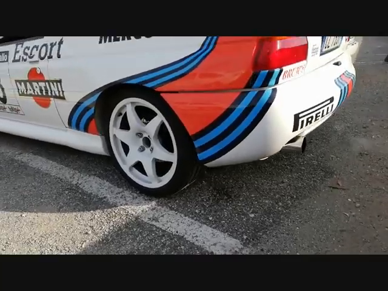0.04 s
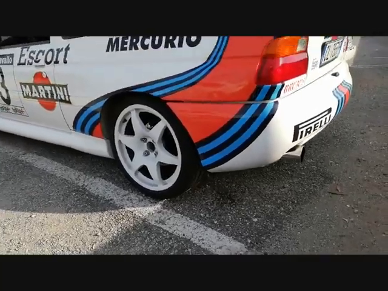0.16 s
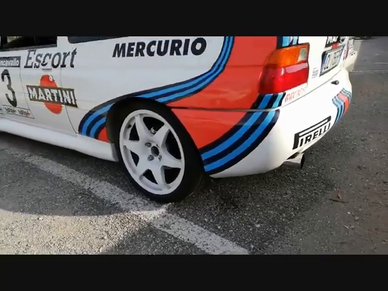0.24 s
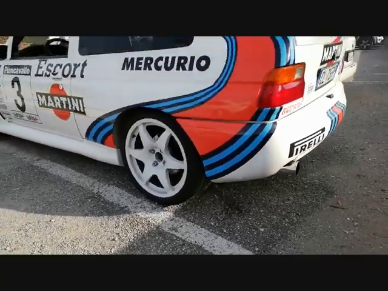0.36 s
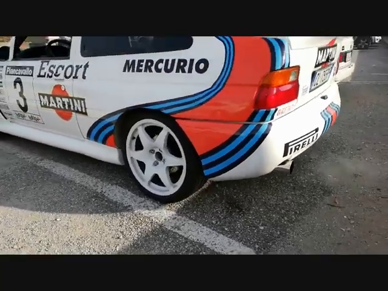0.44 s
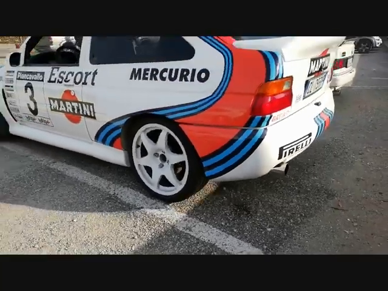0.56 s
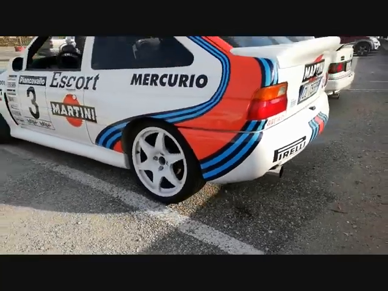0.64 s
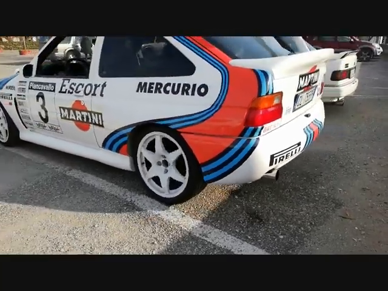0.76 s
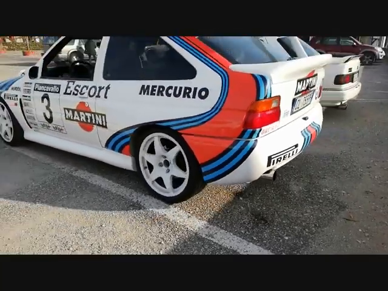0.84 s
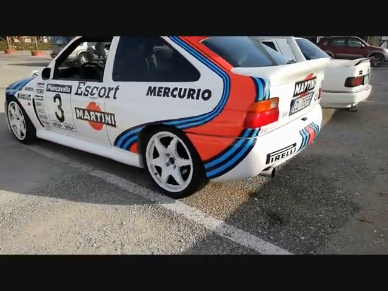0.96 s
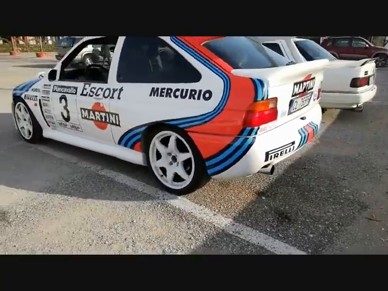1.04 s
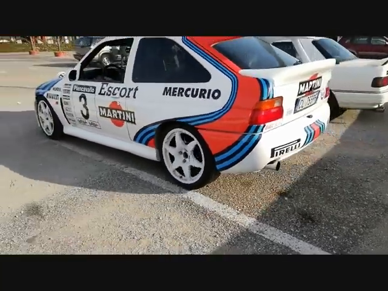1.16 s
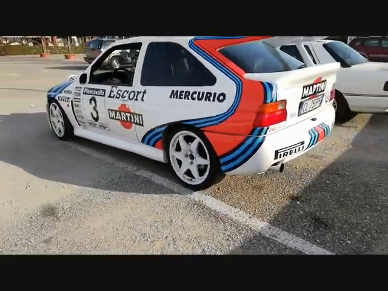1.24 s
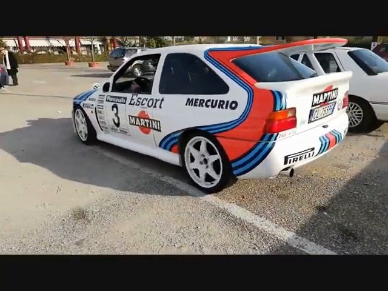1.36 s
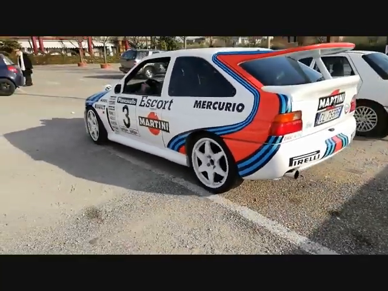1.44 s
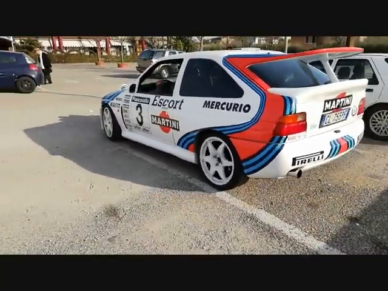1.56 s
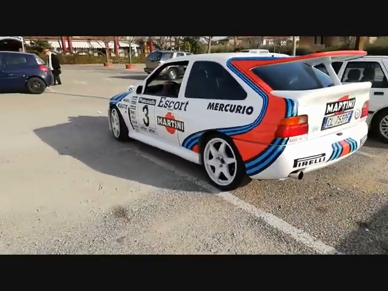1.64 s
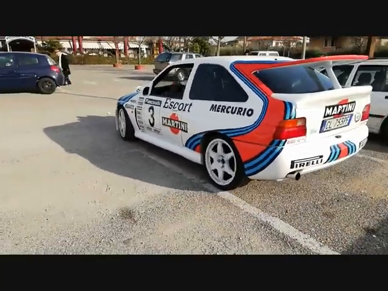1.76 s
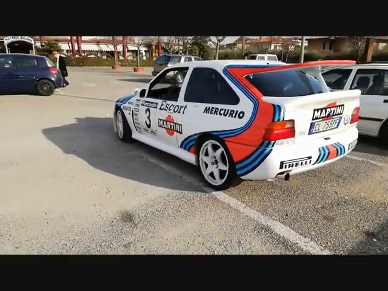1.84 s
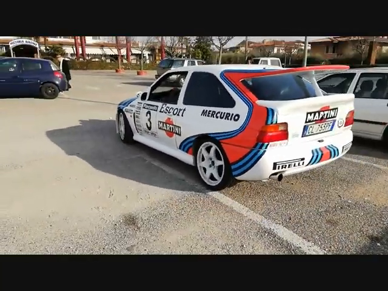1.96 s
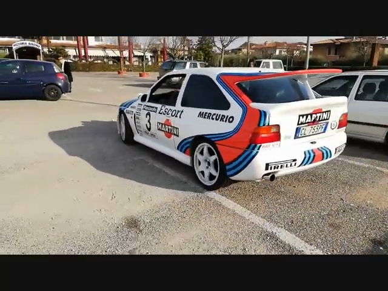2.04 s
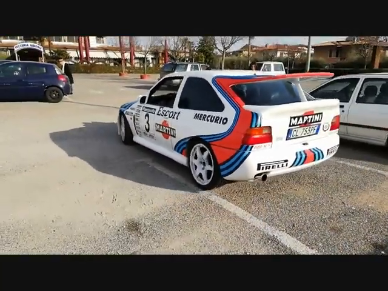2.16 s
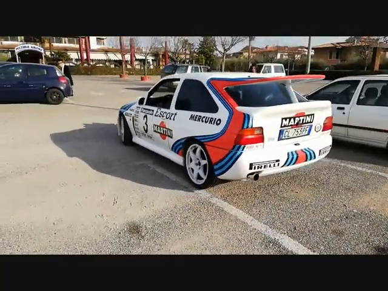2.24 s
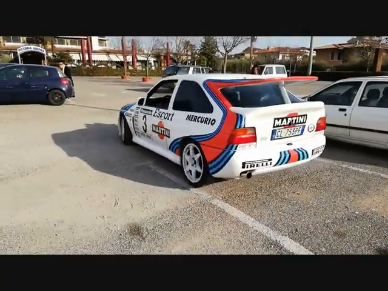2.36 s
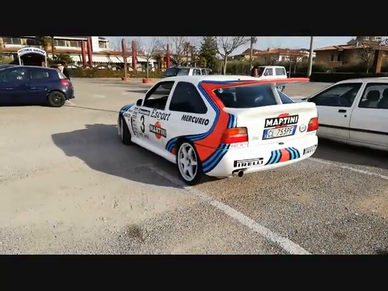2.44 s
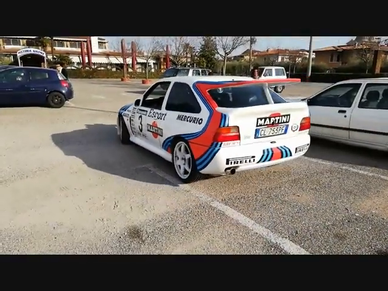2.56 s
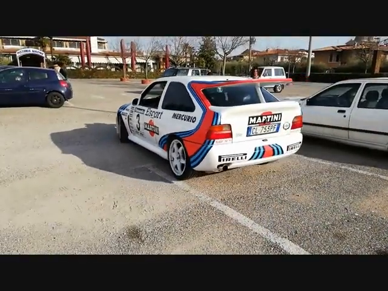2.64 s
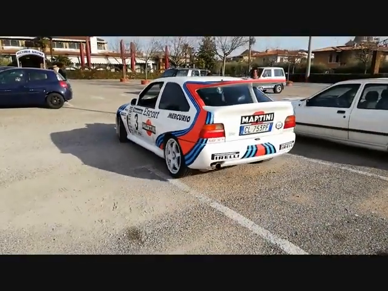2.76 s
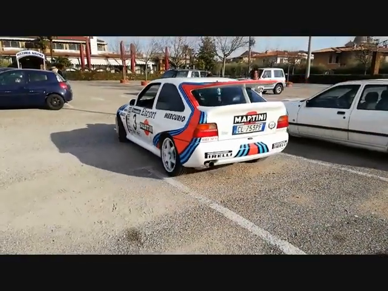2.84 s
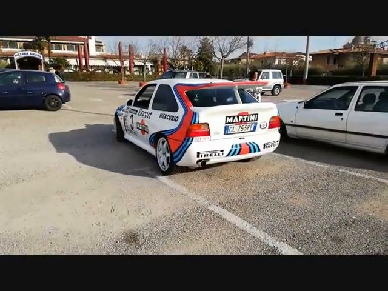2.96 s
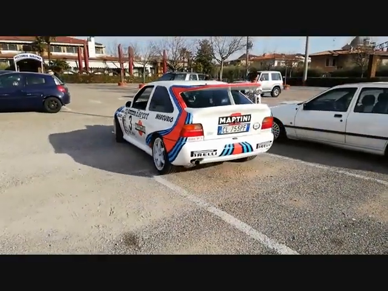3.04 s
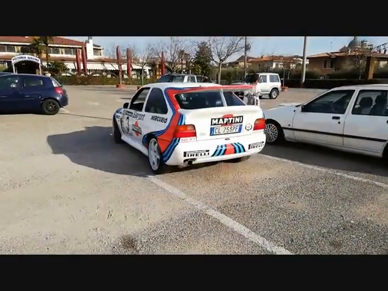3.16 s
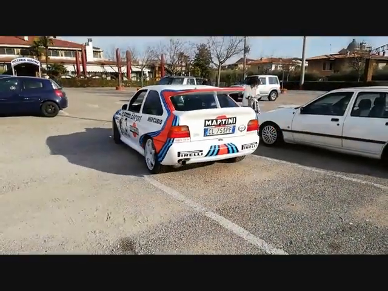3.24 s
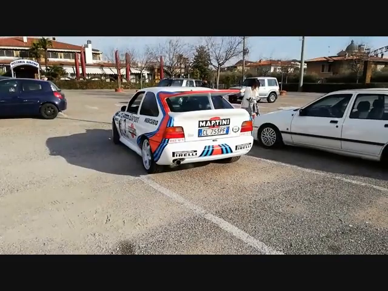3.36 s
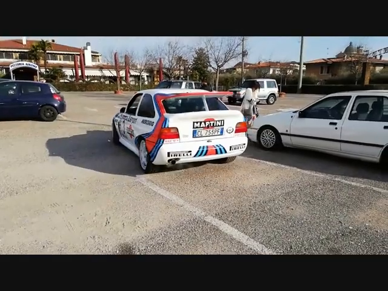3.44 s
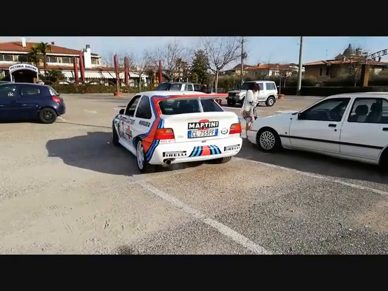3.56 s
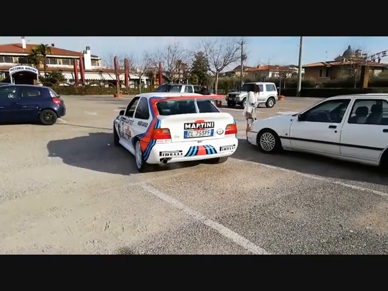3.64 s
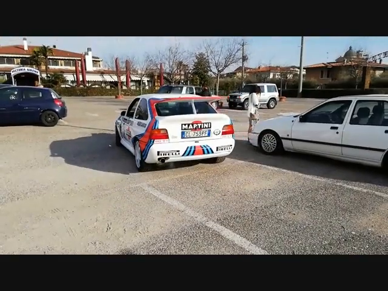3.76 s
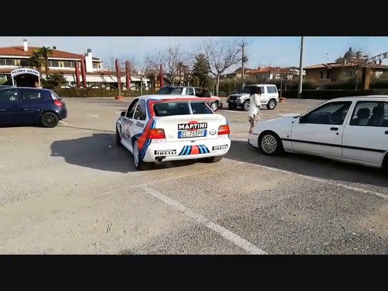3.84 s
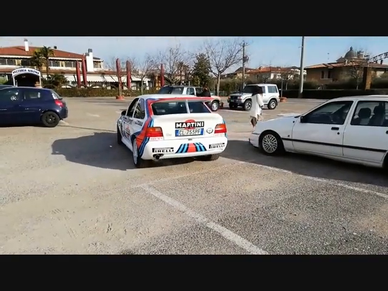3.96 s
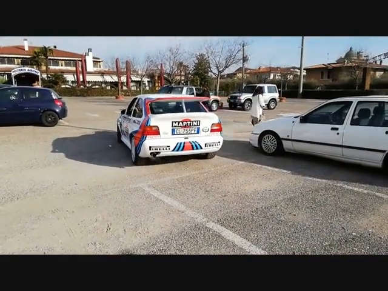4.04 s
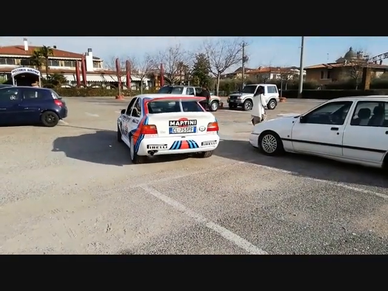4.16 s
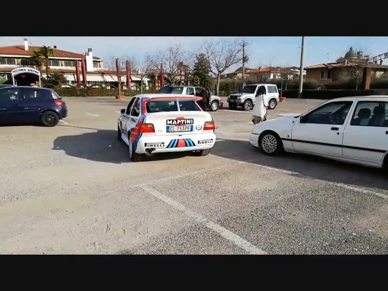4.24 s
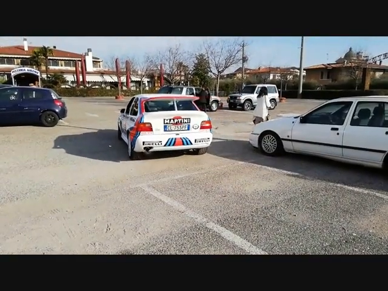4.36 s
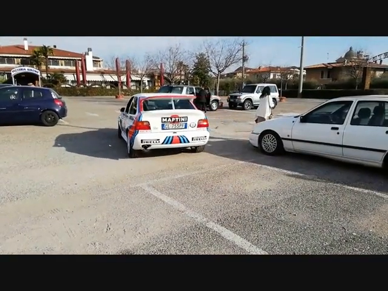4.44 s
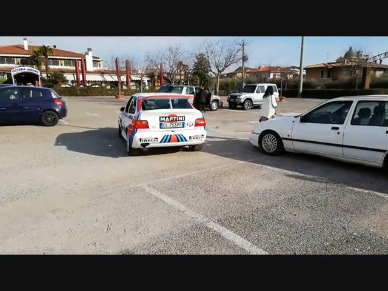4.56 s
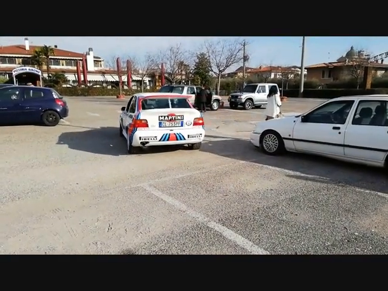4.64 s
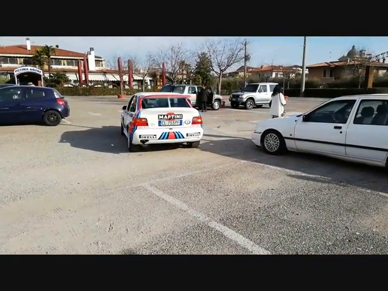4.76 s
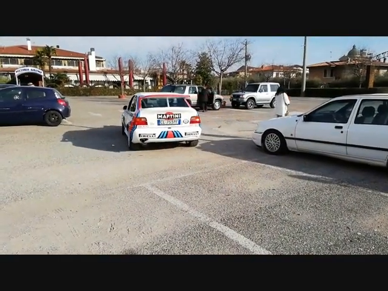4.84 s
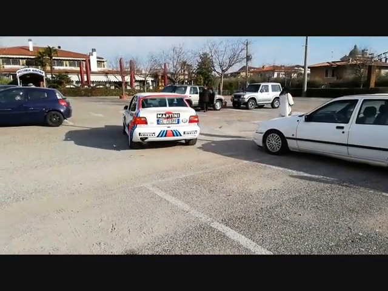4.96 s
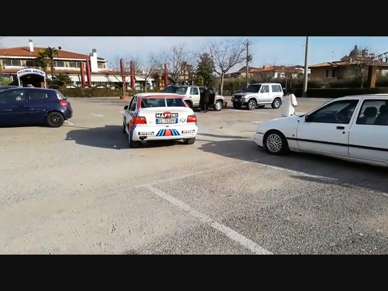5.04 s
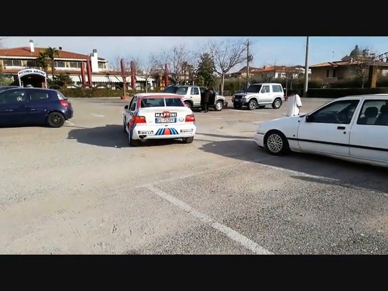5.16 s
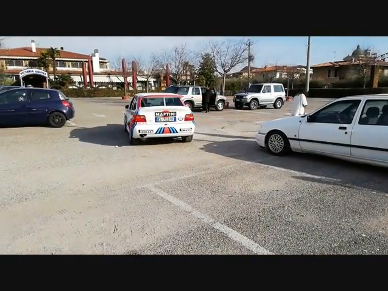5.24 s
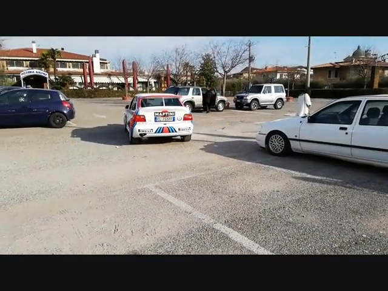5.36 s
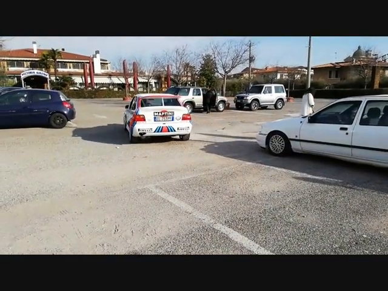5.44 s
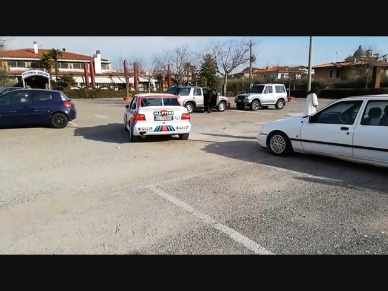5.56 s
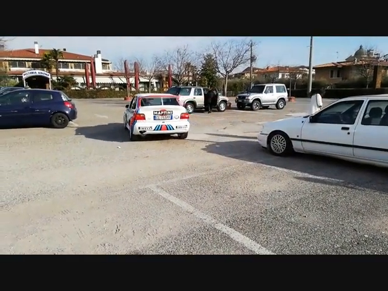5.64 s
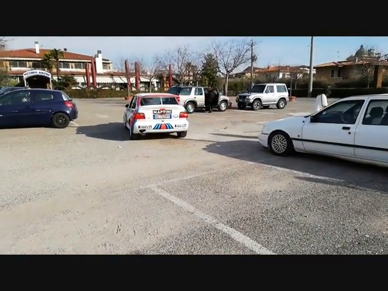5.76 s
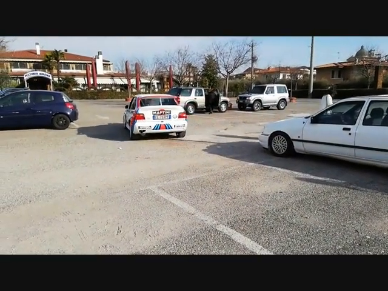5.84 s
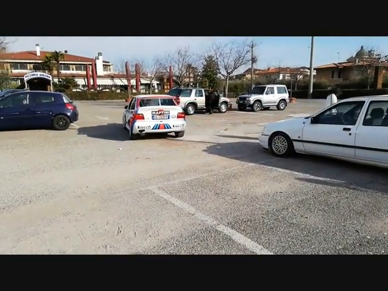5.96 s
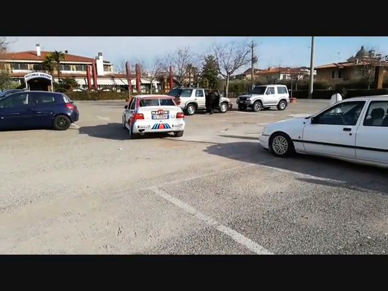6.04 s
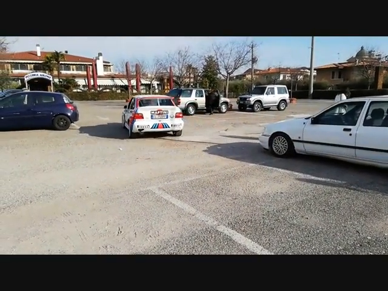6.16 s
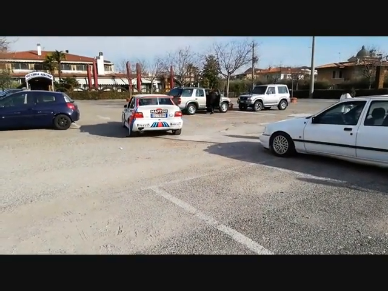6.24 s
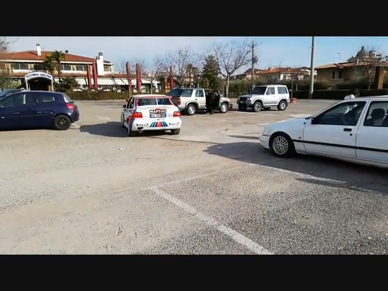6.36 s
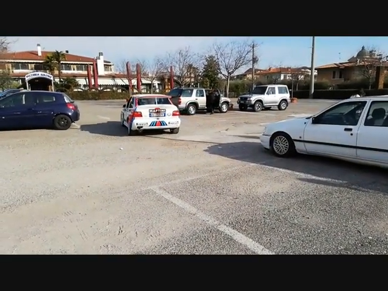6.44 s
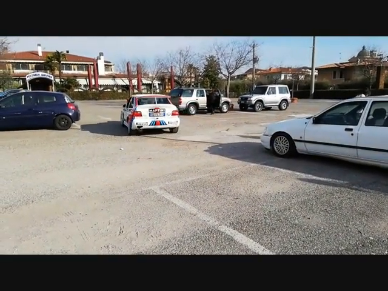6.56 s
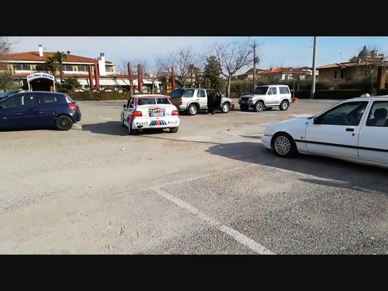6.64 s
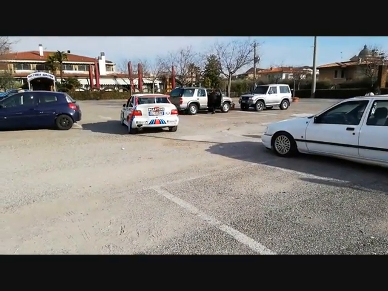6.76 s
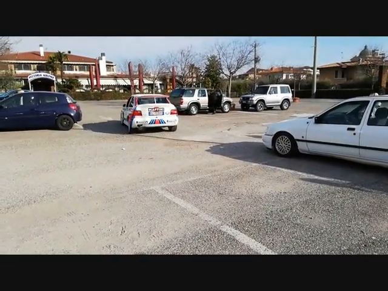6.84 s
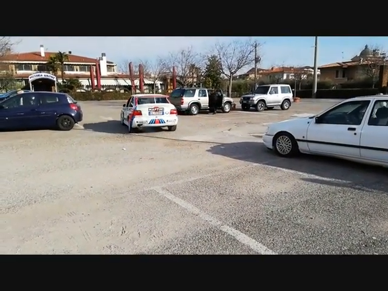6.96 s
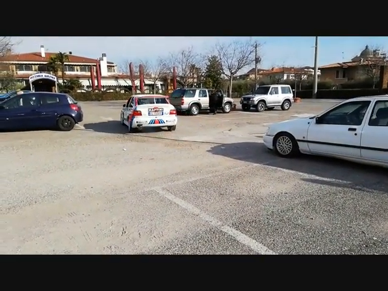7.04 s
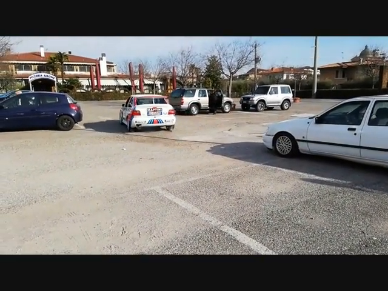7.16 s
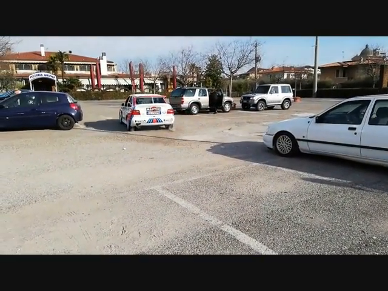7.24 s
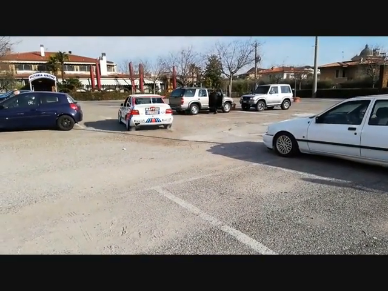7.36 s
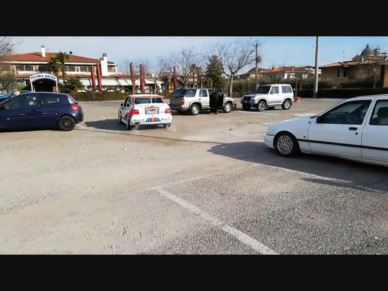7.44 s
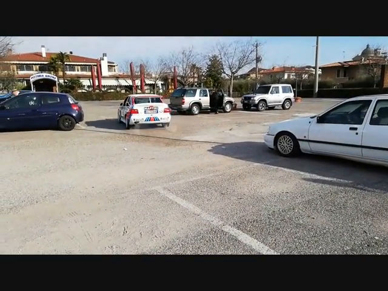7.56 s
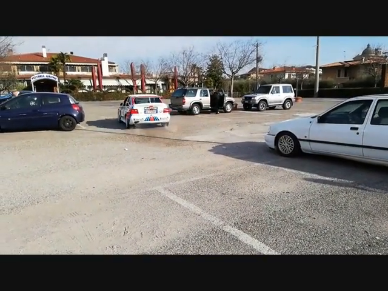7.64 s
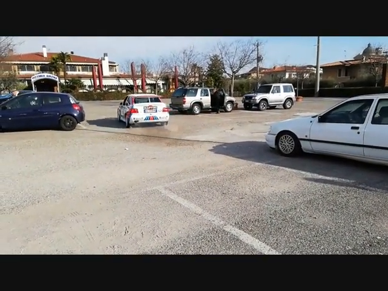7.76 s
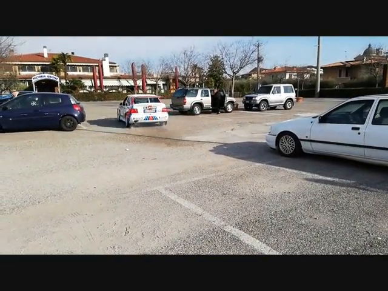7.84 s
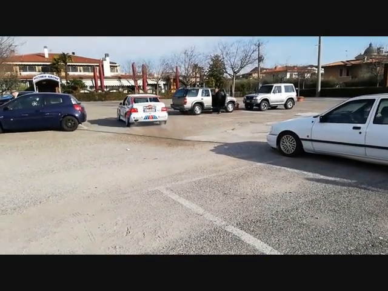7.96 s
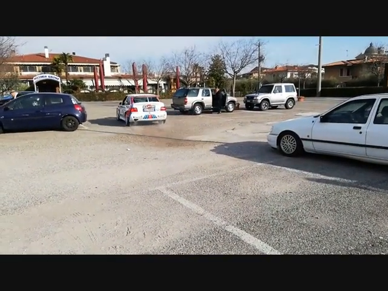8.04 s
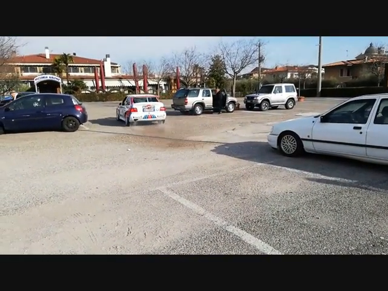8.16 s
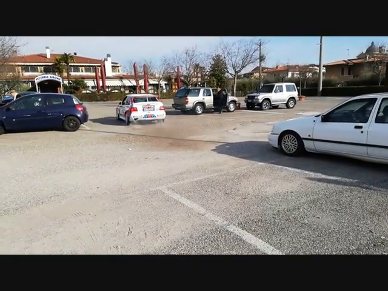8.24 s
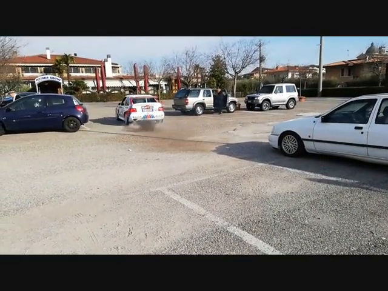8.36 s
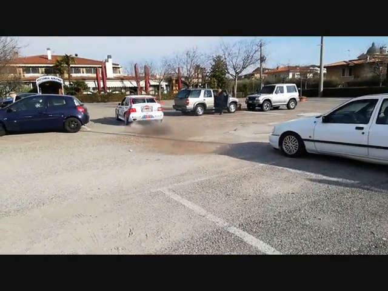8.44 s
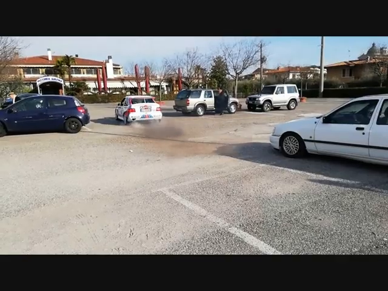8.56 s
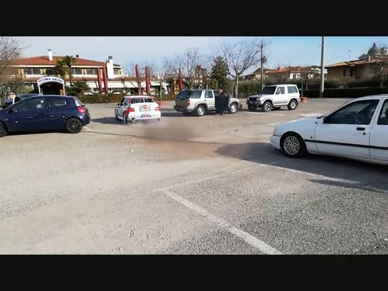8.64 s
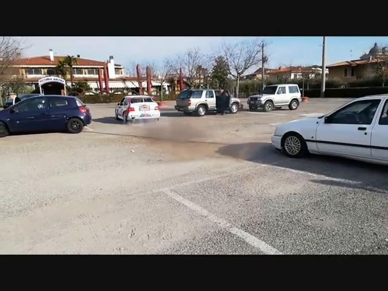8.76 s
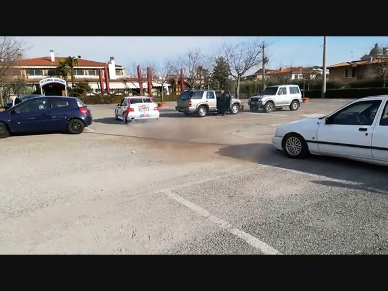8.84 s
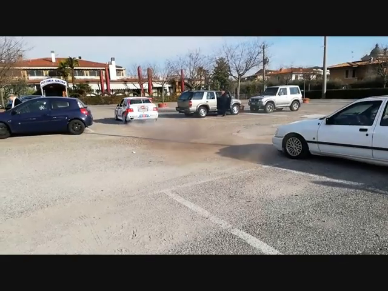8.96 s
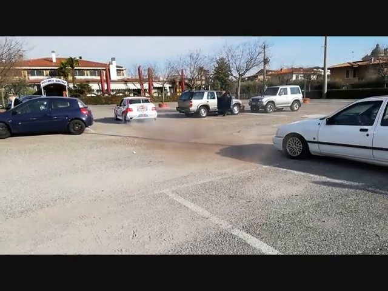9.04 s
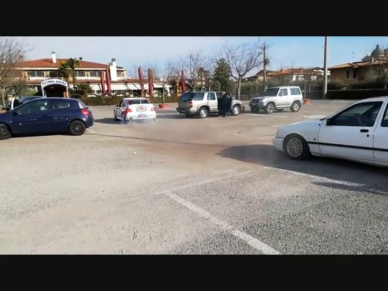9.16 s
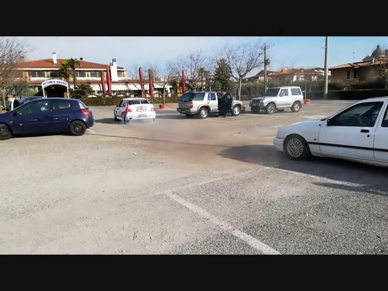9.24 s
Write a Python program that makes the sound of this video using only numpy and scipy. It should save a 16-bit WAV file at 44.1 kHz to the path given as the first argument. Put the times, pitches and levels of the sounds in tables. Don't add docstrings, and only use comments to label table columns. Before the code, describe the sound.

A turbocharged car throbs slowly away over gritty ground, then launches with whistling intake, squealing tyres, limiter-high revs and sharp exhaust bangs.

```python
import sys
import numpy as np
from scipy import signal
from scipy.io import wavfile

SR = 44100
rng = np.random.default_rng(int(sys.argv[2]) if len(sys.argv) > 2 else 0)


def gain_from_db(level_db):
    decades = np.asarray(level_db, float) / 20
    return 10 ** decades


def transcribe(signal):
    frames = np.atleast_2d(signal).T
    limited = np.clip(frames, -1, 1)
    pcm = np.round(limited * 32767).astype(np.int16)
    wavfile.write(sys.argv[1], SR, pcm)


N = 410571
TIME = np.arange(N) / SR


def rms_one(x):
    return x / np.sqrt(np.mean(x ** 2) + 1e-20)


def in_time(rows):
    s, *columns = np.transpose(rows)
    return [np.interp(TIME, s, c) for c in columns]


def at_hz(points, hz):
    table_hz, table_db = np.array(points)[:, 0], np.array(points)[:, 1]
    return np.interp(np.log(hz), np.log(table_hz), table_db)


def drift(rate, first=0, step=1):
    r = np.exp(-40 * np.pi * rate / SR)
    slow = signal.lfilter([1], [1, -2 * r, r * r], rng.standard_normal(N // 20 + 2002))[2000:]
    return np.interp(np.arange(first, N + step - 1, step) / 20, np.arange(len(slow)), rms_one(slow))


def band(x, low_hz, high_hz):
    edges_hz = [low_hz, min(high_hz, .45 * SR)]
    return signal.sosfilt(signal.butter(2, edges_hz, "band", fs=SR, output="sos"), x)


def ring(clicks, hz, t60):
    r, w = gain_from_db(-60 / (t60 * SR)), 2 * np.pi * hz / SR
    return signal.lfilter([0, np.sin(w)], [1, -2 * r * np.cos(w), r * r], clicks + 1e-18)


def clicks_at(seconds, db, sign=1):
    out = np.zeros(N)
    at = np.round(np.asarray(seconds) * SR).astype(int)
    out[np.minimum(at, N - 1)] = sign * gain_from_db(db)
    return out


def bumps(s, half_s, height, slower=1, order=2):
    coarse = TIME[::44]
    total = 0
    for t, half, h in np.broadcast(s, half_s, height):
        stretch = half * np.where(coarse > t, slower, 1)
        total = total + h * np.exp(-np.abs((coarse - t) / stretch) ** order)
    return np.interp(TIME, coarse, total)


def narrow(centre_hz, width_hz):
    first, phase = N - len(centre_hz), 2 * np.pi * np.cumsum(centre_hz) / SR
    return drift(width_hz, first) * np.cos(phase) - drift(width_hz, first) * np.sin(phase)


# pitch_hz, likeness (0 to 1)
LEFT_RIGHT_LIKENESS = [(60, 0.99), (180, 1), (400, 0.23), (900, 0.075), (2000, 0.089), (4900, 0.28),
                       (8000, 0.62), (10500, 0.13), (14700, 0.33)]
# pitch_hz, left_minus_right_db
LEFT_LEAN = [(60, -2), (180, 1), (540, -2.5), (1630, -4), (4880, 0.5), (8000, 1.5), (14700, -2)]


def banded_noise(spectrum, patchy_db, flicker_rate):
    out, together = 0, drift(6.6, step=20)
    lowest_hz, highest_hz = spectrum[0][0], spectrum[-1][0]
    edges = lowest_hz * 2 ** np.arange(0, np.log2(highest_hz / lowest_hz) + .3, 1 / 3)
    white = rng.standard_normal((2, 2, N))
    for k, (low, high) in enumerate(zip(edges, edges[1:])):
        mid, side = band(white[k % 2], low, high)
        hz = np.sqrt(low * high)
        alike = np.clip(at_hz(LEFT_RIGHT_LIKENESS, hz), 0, 1)
        flicker = together + drift(flicker_rate, step=20)
        gain = gain_from_db(at_hz(spectrum, hz) + patchy_db * flicker)
        gain = np.interp(np.arange(N), np.arange(len(gain)) * 20, gain)
        lean = gain_from_db(at_hz(LEFT_LEAN, hz) / 2) ** np.array([[1], [-1]])
        out = out + gain * lean * (np.sqrt(1 + alike) * mid + np.sqrt(1 - alike) * side * [[1], [-1]])
    return rms_one(out)


# time_s, stereo_share (0 to 1)
STEREO_WIDTH = [(0, 1), (4, 0.89), (5, 0.71), (6.3, 0.6), (7, 0.94), (9.31, 0.59)]


def narrowed(x):
    mid = x.mean(axis=0)
    return mid + np.clip(in_time(STEREO_WIDTH)[0], 0, 1) * (x - mid)


# time_s, level_db
CAR_NOISE = [(0, -42), (.7, -45), (1.06, -42.5), (1.4, -42), (2.46, -41), (3.0, -42.5), (3.24, -44),
             (3.7, -46), (3.97, -42.5), (4.3, -46), (5.2, -40.5), (6.65, -40), (6.88, -33.5), (7.35, -27),
             (7.95, -32), (8.2, -25.5), (8.6, -25.5), (9.31, -27.5)]
# centre_s,
# half_length_s, level_db
GRIT_PATCHES = [(0.815, 0.064, -4), (1.038, 0.13, 6), (3.54, 0.11, -3), (3.075, 0.043, -8),
                (5.93, 0.23, 2.5), (6.237, 0.082, -1), (11, 0.036, -2), (8.847, 0.008, -10), (7, .1, -5),
                (7.0, .09, 4), (3.1, .12, 0)]


def noise_levels():
    roar_db, = in_time(CAR_NOISE)
    boost = np.clip((TIME - 6.5) / 0.2, 0, 1)
    swing_db = roar_db + 42.5
    rumble_db = -37.5 + 0.41 * swing_db - 1.26 * TIME + 7 * boost
    hiss_db = -48.5 + 1.035 * swing_db - 0.95 * TIME + 3.5 * boost
    return roar_db, rumble_db, hiss_db + bumps(*np.transpose(GRIT_PATCHES)), boost


# pitch_hz, level_db (per Hz)
BODY_RUMBLE = [(18, -31), (40, 12.5), (90, 7.5), (200, 11.5), (330, 1.5), (470, 3.5), (660, -4.5),
               (900, -5), (1100, -31)]


def body_rumble(rumble_db, beat):
    throb = 1 + .35 * beat
    rumble = gain_from_db(rumble_db + 9) * throb * banded_noise(BODY_RUMBLE, patchy_db=0.4, flicker_rate=7.3)
    return rumble - 0.66 * np.exp(-TIME / 4.0) * band(rumble, 376, 694)


# pitch_hz, level_db (per Hz)
GAS_ROAR = [(560, -12), (800, -2.5), (1300, 1.5), (1850, 0), (2420, -17.5), (2980, -7.5), (4040, -19),
            (5000, -19.5)]


def gas_roar(roar_db, pulse):
    return gain_from_db(roar_db + 5.5) * pulse * banded_noise(GAS_ROAR, patchy_db=1.48, flicker_rate=37.0)


# pitch_hz, level_db (per Hz)
GRIT_HISS = [(1760, -14.5), (3000, 4.5), (4210, -46), (4750, 0), (6800, -7), (8850, -3.5), (10000, 0),
             (11600, -8), (14000, -21), (15300, -19)]


def grit_hiss(boost):
    hiss = banded_noise(GRIT_HISS, patchy_db=0.76, flicker_rate=7.0)
    crunch_s, crunch_half_s, _ = GRIT_PATCHES[1]
    hiss = hiss + bumps(crunch_s, crunch_half_s, [1.4]) * band(hiss, 8800, 16000)
    turbo = .5 * boost * band(hiss, 9300, 10130)
    return hiss + turbo + bumps([6.72], 0.18, 1.3) * band(hiss, 10900, 13500)


# start_s, peak_db, ring_hz,
# bright_part_db (relative to peak)
SHARP_TICKS = [(0.969, -21, 1669, -12), (0.997, -14, 1688, -8), (1.034, -19, 1421, -8), (1.069, -18, 1320, -11),
               (2.002, -18.5, 1163, -8), (2.064, -23, 1370, -8), (2.175, -18, 1020, -13),
               (2.585, -18.5, 1590, -12), (2.869, -24.5, 1333, -1.5), (2.922, -24, 850, -5),
               (3.159, -21, 1460, -16), (3.209, -18.5, 1678, -11.5), (3.291, -26, 1694, -7),
               (3.304, -21, 1200, -2), (3.366, -19, 1012, -15), (3.376, -17, 1071, -15), (3.425, -18, 1200, -9),
               (3.477, -19, 1480, -22), (3.791, -16.5, 1413, -18), (3.804, -28, 889, -1.5),
               (3.868, -26, 1302, -8), (3.958, -16, 1167, -23), (4.587, -11.5, 1242, -24),
               (4.681, -17.5, 1138, -24), (4.9432, -13, 1666, -24), (4.951, -12, 1554, -24),
               (5.0054, -11, 1150, -35.5), (5.025, -7, 1100, -40), (5.057, -8, 1060, -37),
               (5.114, -9, 1066, -40), (0.927, -30, 1500, -7), (0.988, -26, 1400, -10), (1.01, -26, 1510, -2),
               (1.09, -29, 1200, -6), (1.12, -25, 1150, -16), (2.79, -18, 1600, -12.5), (2.115, -28, 1290, -7),
               (2.464, -24, 1300, -8), (2.649, -29, 1300, -2), (2.84, -32, 1300, -1), (3.333, -29, 1312, -3),
               (4.16, -31.5, 1296, 1), (8.312, -4, 1080, -28), (8.454, 10, 1150, -30), (8.511, -10, 1224, -30),
               (8.543, -2, 900, -30), (8.59, -4, 1160, -30), (8.86, -0.5, 1600, -7), (8.039, -5, 1090, -30)]


def sharp_ticks():
    out, u = np.zeros(N), np.arange(round(0.037 * SR)) / SR
    white = rng.standard_normal((len(SHARP_TICKS), len(u)))
    snaps = band(white, 1800, 6100) + 0.89 * band(white, 8900, 11200) + 0.24 * band(white, 8900, 16000)
    snaps = snaps * (1 - np.exp(-u / 0.0027)) * np.exp(-u / 0.0036)
    rattles = band(white, 930.0, 1880.0) * np.exp(-u / 0.0024)
    for (s, db, hz, bright_db), snap, rattle in zip(SHARP_TICKS, snaps, rattles):
        knock = np.sin(2 * np.pi * hz * u) * (1 - np.exp(-u / 0.00079)) * np.exp(-u / 0.00082)
        at = round(s * SR)
        out[at:at + len(u)] += gain_from_db(db) * (knock + gain_from_db(0.57 * bright_db + 9) * rattle + gain_from_db(bright_db + 9) * snap)
    left = np.where(TIME < 4.4, np.roll(out, 4), out)
    return np.array([left, out]) * gain_from_db(np.array([[-1.5], [1.5]]))


# time_s, level_db, pitch_hz
NARROW_RUSH = [(4.9, -60, 1706), (5.1, -45, 1920), (5.25, -44.5, 2052), (5.5, -48, 1753), (5.9, -42, 1700),
               (6.15, -52, 1860), (6.45, -45, 1692), (6.75, -48, 1672), (6.9, -32, 1507), (7.1, -34, 1453),
               (7.25, -60, 1470), (8.15, -60, 2050), (8.18, -25, 1900), (8.23, -30, 1520), (8.32, -27, 1700),
               (8.36, -60, 1700)]
# centre_s, half_length_s, then its tones as pitch_hz, level_db
CHIRP = (4.175, .018, [(7300, -50), (9900, -53)])


def whistles():
    first = 4 * SR
    level_db, centre_hz = (column[first:] for column in in_time(NARROW_RUSH))
    time = TIME[first:]
    rush = narrow(centre_hz, 190.0) + 0.52 * (time < 6.3) * narrow(1.45 * centre_hz, 370.0)
    rush = gain_from_db(level_db) * rush * (time < 8.4) * (time > 4.9)
    s, half_s, tones = CHIRP
    chirp = sum(gain_from_db(db) * narrow(np.full(len(time), hz), 150.0) for hz, db in tones)
    return np.pad(rush + chirp * np.exp(-((time - s) / half_s) ** 2), (first, 0))


# start_s, peak_db, ring_hz
PANEL_SLAPS = [(7.811, -9, 520), (8.049, -14, 475.6), (8.105, -13, 450), (8.3356, 3, 640), (8.342, 2, 560),
               (8.4005, -6, 497), (8.461, -8, 900), (8.543, -5, 620), (8.549, -5, 560), (8.858, -13, 500),
               (9.172, -12, 400), (9.19, -17, 520)]


def panel_slaps():
    out, u = np.zeros(N), np.arange(-300, 300) / SR
    for s, db, hz in PANEL_SLAPS:
        at = round(s * SR)
        out[at - 300:at + 300] += -gain_from_db(db) * np.cos(2 * np.pi * hz * u) * np.exp(-(u / .0016) ** 2)
    return out * np.array([[1], [-0.46]])


# time_s, level_db, pitch_hz
TYRE_SQUEAL = [(7.09, -34, 1123), (7.115, -9.5, 1067), (7.8, -9.5, 1099), (7.83, -14, 1089),
               (7.96, -16, 1121), (8.17, -19, 1196), (8.26, -13, 1219), (8.37, -12.5, 1119),
               (8.6, -16.5, 1147), (8.83, -14.5, 1214), (8.87, -10, 1151), (9.31, -17, 1118)]
# multiple_of_pitch, width_hz, level_db
TREAD_TONES = [(.79, 45, -6), (.9, 25, -1), (1.0, 25, -3), (1.08, 25, 0), (1.19, 30, -2), (1.5, 120, -8),
               (1.66, 120, -11)]
# centre_s, level_db
TREAD_BITES = [(7.135, 2.5), (7.28, 7.5), (7.356, 3.5), (7.38, 9), (7.433, -0.5), (7.6, 0), (7.666, -2),
               (7.688, -0.5), (7.9, 2), (7.951, 2), (8.043, -0.5), (8.155, 1), (8.22, 2.5), (8.316, 1.5),
               (8.49, 1), (8.515, 6.5), (8.595, 7), (8.65, 6), (8.7, 4), (8.75, 6.5), (8.81, 10), (8.79, 4),
               (8.905, 1), (8.945, 6), (9.06, 1), (9.14, 1), (9.202, 0.5), (9.27, 6.5), (9.31, 15)]
# centre_s, half_length_s, pitch_change_hz
SQUEAL_BENDS = [
    (8.194, 0.01515, 148),
    (8.255, 0.036, 91.5),
    (8.311, 0.01295, -110),
    (8.823, 0.03035, 61),
    (8.953, 0.0202, 68),
    (9.061, 0.0257, -59),
]


def tyre_squeal(fires):
    level_db, centre_hz = in_time(TYRE_SQUEAL)
    s, bite_db = np.transpose(TREAD_BITES)
    level_db = level_db + bumps(s, 0.013, bite_db)
    centre_hz = (centre_hz + bumps(*np.transpose(SQUEAL_BENDS))) * (1 + .01 * drift(15))
    start_s = TYRE_SQUEAL[0][0]
    first = round(start_s * SR)
    spread = np.where(TIME > 7.82, 0.54, 1)[first:]
    centre_hz = centre_hz[first:]
    free = 0
    for multiple, width_hz, db in TREAD_TONES:
        if multiple <= 1.3:
            multiple = 1 + (multiple - 1) * spread
        tone_hz = multiple * centre_hz * (1 + .025 * drift(20, first))
        free = free + gain_from_db(db + 3 * drift(16, first)) * narrow(tone_hz, width_hz)
    spinning = TIME > start_s
    kicks = fires * spinning * gain_from_db(0.78 * rng.standard_normal(N))
    kicked = band(band(kicks, 980.0, 1315.0), 1220.0, 2450)
    kicked = kicked / np.std(kicked[spinning])
    out = np.pad(rms_one(free), (first, 0)) + gain_from_db(-11.0) * kicked
    out = out * gain_from_db(level_db - 5.0 + 1.6 * drift(25.0)) * spinning
    echoes = 0.057 * np.array([np.roll(out, 310), -np.roll(out, 420)])
    sideways = (0.72 * band(out, 735, 880) + .5 * band(out, 1680, 1700)) * [[1], [-1]]
    return out * [[.9], [1]] + echoes + sideways


# start_s, peak_db, flame_db, flame_delay_s, direction (1 = push first, -1 = suction first)
BACKFIRES = [(7.039, -18, -55, 0.0041, 1), (7.14, -16, -36, 0.004, 1), (7.246, -15, -27, 0.0025, -1),
             (7.527, -21, -29.5, 0.0018, 1), (7.72, -19, -31, 0.018, 1), (7.803, 0.5, -25.5, 0.0038, 1),
             (7.877, -8.5, -39, 0.001963, 1), (8.039, -7.5, -24, 0.0022, -1),
             (8.097, -6, -27.5, 0.0029, -1), (8.326, 3, -9.5, 0.0075, 1), (8.3922, 4.5, -10.5, 0.0025, 1),
             (8.4533, 0, -16, 0.0012, -1), (8.54, -8, -21, 0.0026, -1), (8.675, -16, -33, 0.0019772, 1),
             (8.849, -3, -12, 0.0072, 1), (8.934, -3.5, -23.5, 0.0016, -1), (9.149, -14, -29.5, 0.018, -1)]
# start_s, peak_db
MUFFLED_BOOMS = [(0.363, -13), (1.349, -13), (6.38, -12.5), (7.039, -7), (7.137, -12), (7.244, -24),
                 (7.413, -25), (7.47, -20), (7.549, -13), (7.722, -13.5), (8.326, -20), (8.649, -15),
                 (8.738, -14), (8.788, -21), (8.935, -14), (8.999, -14), (9.148, -19), (9.198, -13),
                 (9.248, -29)]
# pitch_hz, level_db, time_to_fall_60_db_s
TAILPIPE = [
    (66, 0, 0.21),
    (187, 9, 0.25),
    (436.9, -4, 0.065),
    (520, -15, 0.01435),
    (1000, 13, 0.0071),
]
# delay_s, left_db, right_db
NEAR_ECHOES = [
    (.008, -6, -4.5),
    (0.013, -4.5, -2.5),
]


def backfires(hiss):
    s, peak_db, flame_db, delay_s, sign = np.transpose(BACKFIRES)
    sign = np.sign(sign)
    u = np.arange(round(.008 * SR)) / SR
    shape = np.exp(-((u - .0008) / .0004) ** 2) - .6 * np.exp(-((u - .0032) / .0015) ** 2)
    pulse = signal.fftconvolve(clicks_at(s, peak_db + 4.5, sign), shape)[:N]
    pipe = sum(ring(clicks_at(s + 0.00023, peak_db + db - 19.5, sign), hz, t60) for hz, db, t60 in TAILPIPE[1:])
    blows = clicks_at(s, peak_db - 17) + clicks_at(*np.transpose(MUFFLED_BOOMS)) * gain_from_db(1.0)
    boom_hz, _, boom_t60 = TAILPIPE[0]
    boom = band(ring(blows, boom_hz, boom_t60), 43.0, 160.0)
    u = np.arange(round(.06 * SR)) / SR
    puff = (1 - np.exp(-u / 0.0021)) * np.exp(-u / 0.01)
    flame = signal.fftconvolve(clicks_at(s + delay_s + 0.00033, flame_db - 3.5), puff)[:N]
    low_jet = gain_from_db(15.0) * rms_one(band(rng.standard_normal((2, N)), 350, 1190.0))
    jet = flame * (hiss + 0.72 * hiss.sum(axis=0) + low_jet)
    direct = band(pulse, 31.0, 9000) + pipe
    dull = band(direct, 79.89, 2900)
    echoes = sum(gain_from_db(np.array([[left_db], [right_db]])) * np.roll(dull, round(lag * SR))
                 for lag, left_db, right_db in NEAR_ECHOES)
    return direct + echoes + boom, jet


def spark_cut():
    s, db = np.transpose(BACKFIRES)[:2]
    return bumps(s - .0085, 0.0028, np.clip(db / 12 + 2.0, 0, 1))


# centre_s, half_length_s, loss_db
FUEL_CUTS_LOSS = [
    (8.275, 0.035, 1.5),
    (8.369, 0.013, -14),
    (8.826, 0.033, 3),
    (8.888, .015, -7),
]


def fuel_left():
    return gain_from_db(-bumps(*np.transpose(FUEL_CUTS_LOSS), order=4))


# time_s, firing_hz, exhaust_db
ENGINE_SPEED = [(0, 81.5, -14), (.55, 57.8, -10.5), (1.25, 69.23, -9.5), (2.25, 59.8, -13),
                (2.7, 51.62, -16), (3.55, 37.12, -15), (4.15, 50.83, -20), (4.72, 59.73, -23.5),
                (5.2, 37.54, -27.5), (5.6, 45.8, -29), (6.0, 46.5, -24.5), (6.33, 84.48, -13),
                (6.54, 79.83, -16.5), (7.02, 178.2, 3), (7.21, 160.1, -2.5), (7.8, 186.2, -4.5),
                (8.17, 227.1, 2.5), (9.31, 238.5, 2)]
# centre_s, onset_s, share_of_speed
SPEED_TUGS = [(0.051, 0.029, -0.093), (0.219, 0.081, 0.13), (.95, 0.125, -0.25), (1.701, 0.066, -0.091),
              (1.911, 0.051, 0.031), (2.41, 0.089, -0.1), (3.2, 0.22, -0.023), (4.6, 0.16, 0.027),
              (5.9, 0.074, -0.057), (6.441, 0.036, -0.12), (6.74, 0.051, 0.043), (8.24, 0.04, 0.044),
              (6.12, .06, -.08), (7.08, 0.039, 0.059), (8.43, 0.12, -0.098), (8.92, 0.061, -0.14)]


def engine_speed():
    course_hz, load_db = in_time(ENGINE_SPEED)
    return course_hz * (1 + bumps(*np.transpose(SPEED_TUGS), 1.4)), load_db


# centre_s, half_length_s, note_loss_db, extra_overtone_loss_db
THROTTLE_LIFTS = [(0, 0.026, 2.5, 33), (0.07, 0.0092, 11, -4), (0.134, 0.13, -8, 11), (0.34, 0.081, -4, 17),
                  (0.844, 0.085, 2.5, 12), (1.028, 0.1, 1.5, 3), (1.15, 0.029, -2.5, 6),
                  (1.493, 0.25, 1.5, 13), (1.998, 0.047, 0.5, 21), (2.351, 0.058, 1, 21),
                  (3.0, 0.13, -0.5, 1), (3.4, 0.52, 5.5, -7), (4.655, 0.24, -4.5, -9.5),
                  (4.979, 0.12, -3.5, 5), (5.17, 0.086, -0.5, 5), (5.422, .13, -9, 4.5),
                  (5.878, 0.097, 5.5, -5), (6.17, 0.098, -4, -6.5), (6.271, 0.043, 7, -16.5),
                  (6.45, 0.12, 13.5, -14), (6.625, 0.048, -3, -11), (6.82, 0.12, -2.5, 4),
                  (6.979, 0.052, 2, 5), (7.057, 0.053, 16.5, -18), (7.168, 0.04, 15, 0),
                  (7.445, 0.057, 6, 5), (7.814, 0.013, 17, 2), (7.856, .03, -7, 1), (8.051, 0.16, -6.5, -3),
                  (8.297, 0.062, 15, -4), (8.551, 0.29, -4.5, 8), (8.802, 0.057, 5.5, 10),
                  (9, 0.034, -2.5, -6), (9.118, 0.12, -6, 9), (9.239, 0.062, -2, 8)]
# pitch_hz, level_db
EXHAUST_PASS = [(37, -15), (46, 1.5), (78, -1.5), (95, -11), (135, -15), (180, -10), (245, -23.5),
                (285, -30), (450, -32), (800, -49.5)]
HARMONICS_DB = [0, -2, 1, 2.5]
NEAR_PIPE_DB = [0.5, 9.5, -7, -3.5]
STAB_HARDENS = [0.069, 0.84, 0.17, 0.062]


def harmonic_levels(firing_hz, load_db):
    s, half_s, note_db, overtones_db = np.transpose(THROTTLE_LIFTS)
    load_db = load_db - bumps(s, half_s, note_db)
    closed_db = bumps(s, half_s, overtones_db, order=4)
    levels_db = []
    for k, db in enumerate(HARMONICS_DB):
        level_db = load_db + db + NEAR_PIPE_DB[k] * np.exp(-TIME / 1.25)
        level_db = level_db + at_hz(EXHAUST_PASS, (k + 1) * firing_hz)
        level_db = level_db - (k > 0) * np.maximum(closed_db, 0)
        levels_db.append(level_db - STAB_HARDENS[k] * np.minimum(closed_db, 0))
    return levels_db, closed_db


def exhaust_note(turns, firing_hz, levels_db):
    wobble_db = np.clip(firing_hz / 200, .5, 1) * drift(20)
    slip = .25 + .3 * np.sin(1.9 * TIME)
    note = 0
    for k, db in enumerate(levels_db):
        shaken_db = db + (2.5 + 1.6 * k * (firing_hz > 150)) * wobble_db
        note = note + np.sqrt(2) * gain_from_db(shaken_db) * np.cos(2 * np.pi * (k + 1) * turns + k ** 2 * slip)
    for k in (5, 6):
        silenced_db = 0.8 * np.clip(k * firing_hz - 260, 0, 45)
        level_db = levels_db[3] - 3.5 * (k - 4) - silenced_db + 2 * drift(5)
        note = note + gain_from_db(level_db) * np.cos(2 * np.pi * k * turns + (k - 1) ** 2 * slip)
    for k, db in ((1, -52.0), (3, -33.0), (5, -28)):
        note = note + gain_from_db(levels_db[0] + db + 5.9 * drift(39.0)) * np.cos(np.pi * k * turns)
    return -note


# centre_s, half_length_s, level_db (over smooth running)
ROUGH_BURNING = [(6.499, 0.14, 11), (7.085, 0.1, 17), (7.504, 0.06, 22), (8.058, 0.083, 22),
                 (8.716, 0.2, 18), (9.157, 0.14, 20)]
# centre_s, half_length_s, level_db
PIPE_CRACKLES = [(8.2, 0.035, 11), (8.428, .03, 21), (8.743, .07, 12.5), (8.94, 0.037, 12),
                 (9.01, 0.028, 12), (9.101, .03, 6), (9.18, 0.039, 16.5), (9.249, 0.029, 10)]


def uneven_burning(per_second):
    lumps = band(band(per_second * rng.standard_normal(N), 46.0, 183.0), 34.4, 460.0)
    lumps = gain_from_db(-39 + bumps(*np.transpose(ROUGH_BURNING))) * rms_one(lumps)
    crackle = rms_one(band(per_second * rng.standard_normal(N), 320, 664))
    return lumps + gain_from_db(-35.5 + bumps(*np.transpose(PIPE_CRACKLES))) * crackle * (TIME > 7)


# pitch_hz, level_db, time_to_fall_60_db_s
SILENCER_SHELL = [
    (232, -27, 0.032),
    (366, 6, 0.012),
]
# centre_s, half_length_s, level_db
SHIELD_BUZZES = [
    (.17, .08, 8),
    (0.604, 0.081, 6),
    (1.14, 0.059, 13),
]


def shell_and_shield(per_second, firing_hz, closed_db, shell_db):
    strengths = per_second * gain_from_db(1.5 * rng.standard_normal(N))
    shell = sum(gain_from_db(db) * ring(strengths, hz, t60) for hz, db, t60 in SILENCER_SHELL)
    shell_db = shell_db + 3.3 * np.exp(-TIME / 1.25) - 0.7 * closed_db
    shell = gain_from_db(shell_db) * rms_one(band(shell, 126.0, 455.0))
    shell = shell * np.clip(70 / firing_hz, 0, 1) ** 2
    buzz_db = -38 + bumps(*np.transpose(SHIELD_BUZZES)) - 7 * TIME - 0.77 * closed_db
    return shell + gain_from_db(buzz_db) * rms_one(band(ring(strengths, 658, 0.012), 520, 950))


def engine(shell_db):
    firing_hz, load_db = engine_speed()
    levels_db, closed_db = harmonic_levels(firing_hz, load_db)
    turns = np.cumsum(firing_hz * (1 + .004 * drift(25))) / SR
    fires = np.diff(np.floor(turns), prepend=0)
    per_second = fires * np.sqrt(60 / firing_hz)
    note = exhaust_note(turns, firing_hz, levels_db)
    note = note + shell_and_shield(per_second, firing_hz, closed_db, shell_db)
    beat = np.cos(2 * np.pi * turns + np.pi)
    return note, uneven_burning(per_second), beat, fires


# time_s, delay_samples
LEFT_DELAY = [(0, 22.5), (1, 21), (4.5, 18.5), (6.3, 19), (6.7, 2), (7.6, -5.5), (8.3, -4), (9.31, -7)]


def delayed_left(left):
    return np.interp(np.arange(N) - in_time(LEFT_DELAY)[0], np.arange(N), left)


def hiss_aside(hiss):
    aside = bumps([5.5], .95, 0.97, order=4)
    delay = 22 + 0.82 * (TIME - 5.5)
    late = np.interp(np.arange(N) - delay, np.arange(N), hiss[0])
    hiss[0] = np.cos(aside) * hiss[0] + np.sin(aside) * late
    return hiss


def scene():
    roar_db, rumble_db, hiss_db, boost = noise_levels()
    note, lumps, beat, fires = engine(rumble_db - 11.5)
    pulse = 1 + .08 * beat
    roar = gas_roar(roar_db, pulse)
    rumble = body_rumble(rumble_db, beat)
    hiss = grit_hiss(boost)
    blast, jet = backfires(hiss)
    cut, fuel = spark_cut(), fuel_left()
    driven = (note + tyre_squeal(fires)) * (1 - 0.61 * cut)
    middle = band(band(note + 0.47 * lumps, 330, 560), 330, 560)
    aslant = gain_from_db(-1.5) * middle * fuel * [[1], [-1]]
    noise = fuel * (lumps + narrowed(rumble)) + np.sqrt(fuel) * narrowed(roar)
    left, right = driven + noise + blast + aslant
    car = np.array([delayed_left(left), right])
    hiss = hiss_aside(narrowed(hiss))
    hiss = hiss * (1 - 0.62 * np.roll(cut, round(.004 * SR)))
    hiss = gain_from_db(hiss_db + 5.5) * pulse * hiss
    return car + jet + panel_slaps() + sharp_ticks() + whistles() + hiss


def low_pass(x):
    return signal.sosfilt(signal.butter(12, 15300, fs=SR, output="sos"), x)


def record(dry):
    over_db = np.maximum(20 * np.log10(np.abs(dry).max(axis=0) + 1e-9) + 2.16, 0)
    release = 70 * TIME
    held_db = np.maximum.accumulate(over_db + release) - release
    duck_db = np.roll(signal.lfilter([.02], [1, -.98], held_db), -60)
    return low_pass(np.clip(dry * gain_from_db(-duck_db), -1, 1))


dry = scene()
out = record(dry)
transcribe(out)
```